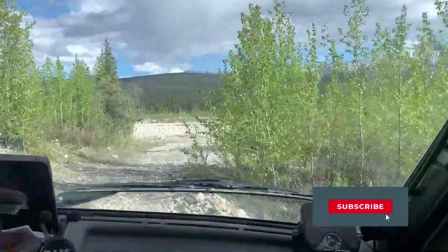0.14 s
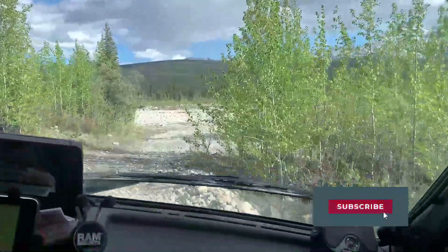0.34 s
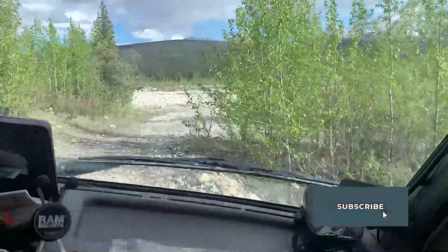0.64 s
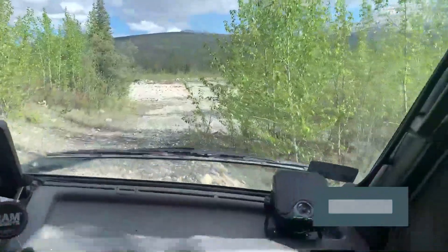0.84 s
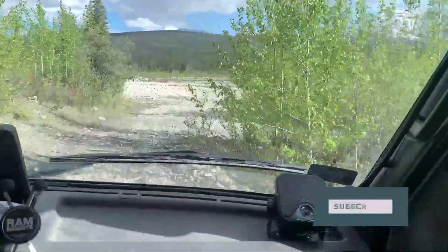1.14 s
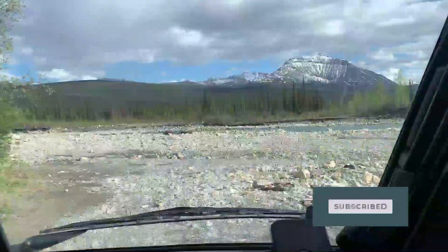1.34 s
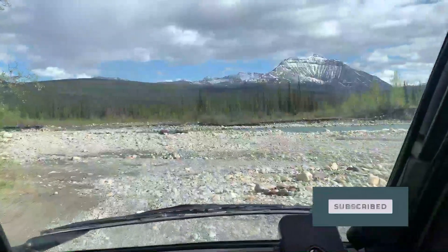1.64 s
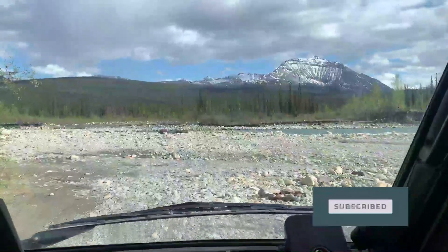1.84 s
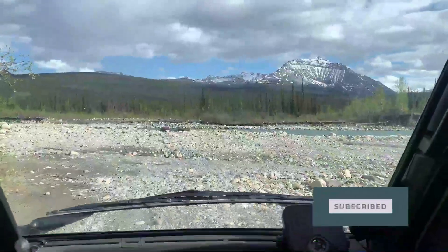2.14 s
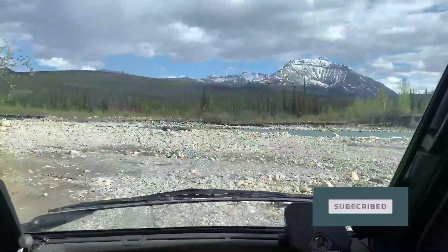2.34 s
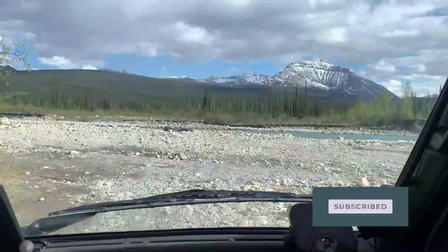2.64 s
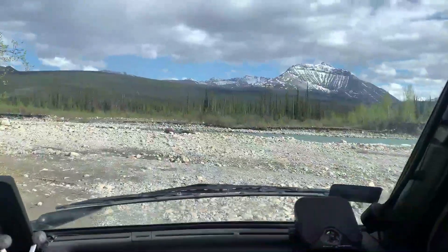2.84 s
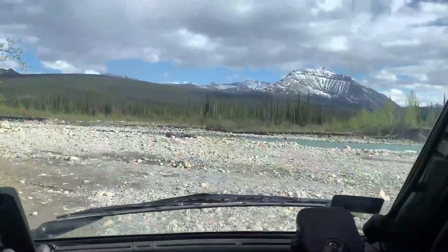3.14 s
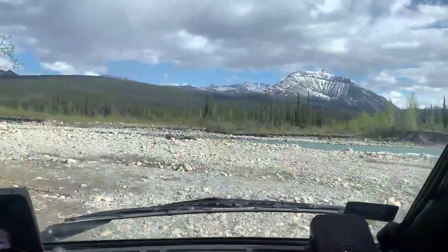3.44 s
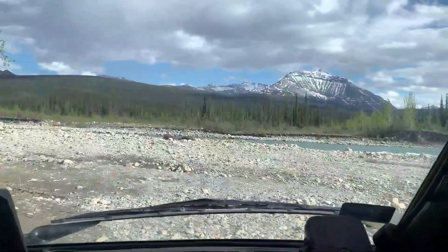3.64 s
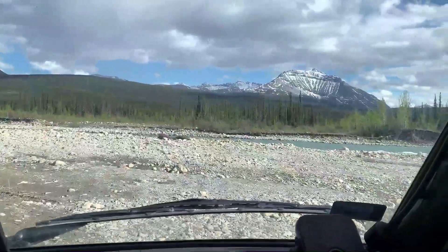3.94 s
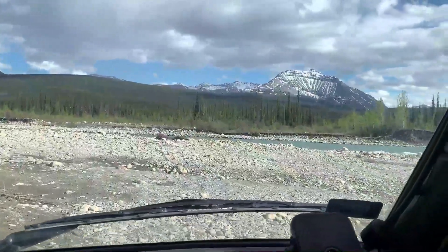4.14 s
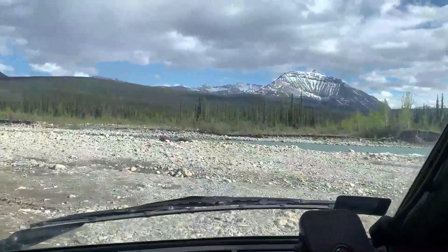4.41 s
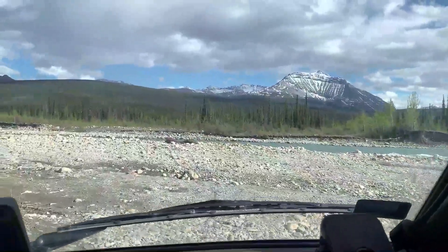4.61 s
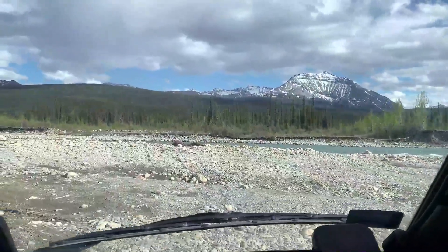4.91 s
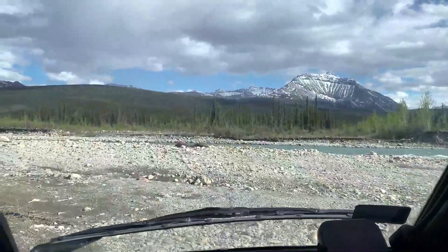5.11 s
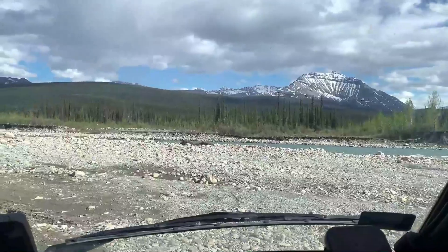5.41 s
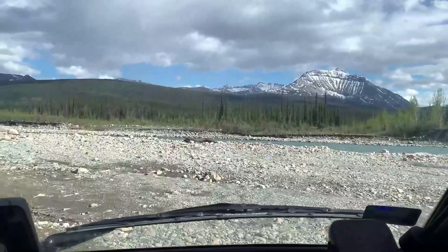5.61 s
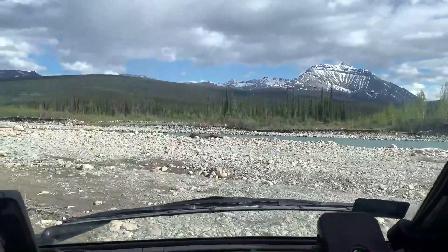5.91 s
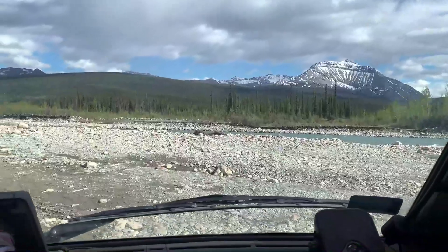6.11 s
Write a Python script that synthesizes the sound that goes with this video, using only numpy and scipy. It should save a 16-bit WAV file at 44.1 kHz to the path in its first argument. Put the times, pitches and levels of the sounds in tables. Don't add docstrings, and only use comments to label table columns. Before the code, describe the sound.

Diesel van crawls over rocks with boomy lurches, grinding stones and clattering cabin parts, abruptly cutting to quieter gravel crunch and idle.

```python
import sys
import numpy as np
from scipy import signal
from scipy.fft import rfft, irfft, next_fast_len
from scipy.io import wavfile
from scipy.ndimage import uniform_filter1d, map_coordinates

SR = 44100
rng = np.random.default_rng(int(sys.argv[2]) if len(sys.argv) > 2 else 0)


def ratio(d):
    e = np.asarray(d, float) / 20
    return 10 ** e


def pcm_store(signal):
    levels = np.round(np.clip(np.atleast_2d(signal), -1, 1) * 32767)
    wavfile.write(sys.argv[1], SR, levels.astype(np.int16).T)


N = 276066
SCENE_CHANGE_S = 1.3575


def unit(x):
    return x / np.sqrt(np.mean(x ** 2) + 1e-20)


def along(points, hz):
    f, v = np.transpose(points)
    return np.interp(np.log(hz + 1), np.log(f + 1), v)


def curves(rows):
    s, *cols = np.transpose(rows)
    return [np.interp(np.arange(N) / SR, s, c) for c in cols]


def wobble(knots_per_s):
    knots = rng.standard_normal(int(N * knots_per_s / SR) + 4)
    return map_coordinates(knots, [np.arange(N) * knots_per_s / SR])


def filtered(x, response):
    m = next_fast_len(N + 8192)
    return irfft(rfft(x, m) * response(np.fft.rfftfreq(m, 1 / SR)), m)[..., :N]


def trim(hz):
    # (frequency [Hz], width [Hz], lift [dB])
    trim_notes = [(617, 18, 7), (1340, 35, 5), (1496, 15, 3), (1672, 34, 5.5), (2330, 25, 1.5),
                  (2970, 17, 6), (3270, 34, 4), (3620, 26, 2), (3671, 15, -4), (4000, 15, 3),
                  (4100, 14, 4.5), (6000, 32, 7.5), (6640, 60, 5.5), (10600, 18, 9)]
    return ratio(sum(db / (1 + (2 * (hz - note_hz) / width_hz) ** 2) for note_hz, width_hz, db in trim_notes))


def rush(spectrum, patchy_db):
    z = signal.stft(rng.standard_normal((2, N)), nperseg=512)[2]
    field = uniform_filter1d(rng.standard_normal(z.shape[1:]), size=7, axis=0)
    field = uniform_filter1d(field, size=4, axis=1)
    pair = signal.istft(z * ratio(patchy_db * unit(field)), nperseg=512)[1][:, :N]
    return unit(filtered(pair, lambda hz: ratio(along(spectrum, hz)) * trim(hz)))


def swell(t, rise_s, t60_s):
    return (1 - np.exp(-t / rise_s)) * ratio(-60 * t / t60_s)


def bursts(times_s, dbs, t60s, rise_s):
    env, t = np.zeros(N + SR), np.arange(SR // 4) / SR
    for s, db, t60_s in zip(times_s, dbs, t60s):
        env[round(s * SR):][:len(t)] += ratio(db) * swell(t, rise_s, max(t60_s, .01))
    return env[:N]


def clatter(phase, t60_s):
    sizes = ratio(4.7 * rng.standard_normal(int(phase[-1]) + 1))
    size = sizes[phase.astype(int)]
    rate_hz = np.gradient(phase) * SR
    return size * swell(phase % 1 / rate_hz, .002, t60_s)


def rocking(rows):
    out, t = np.zeros(N), np.arange(N) / SR
    for s, db, width_s in rows:
        near = slice(max(round((s - 4 * width_s) * SR), 0), round((s + 4 * width_s) * SR))
        out[near] += ratio(db) * np.exp(-((t[near] - s) / width_s) ** 2)
    return out


def pebbles(count, centre_hz, spread, cycles, size_db):
    draw, t = rng.random((count, 5)), np.arange(700) / SR
    hz = centre_hz * np.exp(spread * (2 * draw[:, 1:2] - 1))
    life_s = np.minimum(cycles * (.5 + draw[:, 2:3]) / hz, .005)
    size = ratio(size_db * draw[:, 3:4]) * np.sqrt(centre_hz / hz)
    ring = size * t / life_s * np.exp(-t / life_s) * np.sin(2 * np.pi * hz * t)
    port_start = (draw[:, 4:] > .5) * 2 * N
    at = (draw[:, :1] * N).astype(int) + np.arange(len(t)) + port_start
    return unit(np.bincount(at.ravel(), ring.ravel(), 4 * N).reshape(2, -1)[:, :N])


def engine():
    # (time [s], rate [Hz])
    firing_rate = [(0, 49.3), (.1, 50), (.36, 46.5), (.6, 51), (.8, 50.5), (1.1, 53), (1.35, 51),
                   (1.37, 49.5), (6.26, 49.4)]
    # (time [s], level [dB])
    firing_level = [(0, -30.5), (.074, -20), (.194, -23.5), (1.074, -16.5), (1.146, -23.5), (1.218, -15),
                    (1.35, -31), (1.54, -27), (1.82, -52), (1.97, -29), (2.23, -43), (2.42, -33), (2.72, -31),
                    (3.28, -35), (3.82, -30), (4.44, -31), (6.04, -31.5), (6.26, -37)]
    # (time [s], level [dB], width [s])
    jolts = [(1.535, -14, 0.014), (1.72, -22, .03), (1.92, -17, 0.024), (2.04, -32, 0.023),
             (2.13, -26, 0.022), (2.2, -20, 0.02), (2.34, -20, 0.026), (2.41, -15, 0.0098),
             (2.52, -18.5, 0.028), (2.58, -30, 0.023), (2.8, -31, 0.078), (2.975, -24, 0.028),
             (3.23, -20.5, 0.038), (3.3, -18, 0.02), (3.44, -19.5, 0.03), (3.52, -21, 0.01),
             (3.62, -29, 0.02), (4.27, -23, 0.03), (4.4, -24, 0.032), (4.48, -24, 0.044),
             (4.62, -19, 0.0053), (4.7, -26, 0.022), (5.55, -28, 0.022), (5.81, -25, 0.04),
             (5.98, -28, 0.04)]
    # (multiple of full cycle [1], level re firing tone [dB])
    idle_orders = [(4, -15), (5, -21), (6, -15), (7, -19.5), (9, -26.5), (10, -16), (11, -15), (12, -22),
                   (13, -15.5), (19, -18)]
    # (frequency [Hz], density [dB/Hz])
    tappet_spectrum = [(7000, -37), (9500, -7), (10900, -8), (12500, -11), (15800, -31)]
    (firing_hz,), (level_db,) = curves(firing_rate), curves(firing_level)
    cycle = np.cumsum(firing_hz / 8) / SR
    firing = 2 * np.pi * 8 * cycle
    harmonics = np.sin(firing) - 0.17 * np.cos(2 * firing) - 0.064 * np.sin(3 * firing)
    tone = (ratio(level_db) + ratio(-5.5) * rocking(jolts)) * harmonics
    for order, db in idle_orders:
        order_gain = ratio(-29.0 + db + 5 * wobble(4))
        tone += order_gain * np.sin(2 * np.pi * (round(order) * cycle + rng.random()))
    ticking = 0.48 + unit(clatter(cycle * 8 / 2, 0.068))
    tappet = ratio(-84.5) * ticking * rush(tappet_spectrum, patchy_db=3.0)
    return np.sqrt(2) * tone * [[1], [0]] + tappet


def road():
    # (time [s], roughness [dB])
    ground = [(0, 13), (.184, 3), (.46, 13), (.71, 13.5), (.83, 6), (.97, 13.5), (1.08, 9.5), (1.16, 13.5),
              (1.352, 3.5), (1.74, 3.5), (2.04, 0), (2.4, 2), (3.68, 2), (3.78, -2), (4.36, 1.5), (4.9, 0),
              (5.41, -5), (6.26, -5)]
    # (time [s], peak [dB], hardness [dB], t60 [s])
    climb_stones = [(.156, -42, -14, 0.053), (.2853, -36, 6, 0.069), (0.375, -29, -2, 0.057),
                    (.4519, -34.5, 20, 0.041), (.5003, -24, 2, 0.04), (.5594, -64, 17, 0.039),
                    (.5861, -31.5, -11, 0.052), (0.616, -26, 0, 0.09), (0.718, -35.5, -1.5, 0.25),
                    (.758, -29.5, 1.5, 0.084), (.789, -25, -11.5, 0.037), (.851, -26, 4, 0.065),
                    (.874, -20, 7, 0.027), (0.894, -26, 18, 0.073), (0.918, -29.5, 14.5, 0.1),
                    (.979, -31, 6, 0.084), (1.007, -29, -3, 0.03), (1.11, -21.5, 7.5, 0.1),
                    (1.16, -26, -5.5, 0.062), (1.1894, -21, 0, 0.023), (1.3427, -24.5, -4, 0.028)]
    # (time [s], peak [dB], hardness [dB], t60 [s])
    gravel_stones = [(1.459, -34.5, -15, 0.025), (1.5424, -39, 19, 0.029), (1.672, -44, -17, 0.042),
                     (1.717, -37.5, 12, 0.1), (2.152, -41.5, -19, 0.048), (2.233, -35, 2, 0.12),
                     (2.3094, -43, 12.5, 0.12), (2.387, -27.5, 2, 0.051), (2.435, -29.5, 7, 0.06),
                     (2.53, -39, -5, 0.076), (2.7094, -30.5, -7, 0.033), (2.75, -38.5, -16, 0.031),
                     (2.9851, -29, -1, 0.022), (3.035, -51, -7, 0.021), (3.1073, -37, -16.5, 0.03),
                     (3.2161, -38, 2, 0.07), (3.378, -37.5, 11, 0.088), (3.8861, -53, -11, 0.063),
                     (4.014, -30.5, 0, 0.033), (4.156, -40.5, 1, 0.076), (4.181, -39, 1, 0.056),
                     (4.253, -37, 11, .055), (4.2706, -42, 8, .029), (4.307, -45, -9, 0.1),
                     (4.596, -37, 6, 0.076), (4.813, -52, -2, 0.031), (4.916, -35, 4.5, 0.07),
                     (5.3134, -51, -16, 0.044), (5.729, -44.5, -2, 0.11), (6.068, -38.5, -4, 0.028)]
    # (time [s], swell [dB], width [s])
    bumps = [(0, -27.5, 0.062), (.244, -22.5, 0.052), (.458, -31, 0.072), (.714, -30, 0.048),
             (.97, -29, 0.11), (1.156, -25.5, 0.081), (1.6, -29.5, 0.068), (1.74, -24.5, 0.059),
             (1.891, -26, 0.035), (2.04, -27, 0.063), (2.4, -26.5, 0.23), (2.55, -39, 0.054),
             (2.9, -27, 0.16), (3.11, -27.5, 0.025), (3.32, -35, 0.097), (3.53, -36, 0.066),
             (3.72, -36, 0.03), (4.05, -37.5, 0.23), (4.36, -35, 0.15), (4.62, -31.5, 0.086),
             (4.92, -31.5, 0.035), (5.3, -49, 0.25), (5.75, -41, 0.11), (5.99, -38, 0.043)]
    # (frequency [Hz], density [dB/Hz])
    boom_spectrum = [(14, -51), (24, -29), (34, -15), (42, -2), (54, 1), (70, -2.5), (85, -4.5), (115, -4),
                     (135, -9), (155, -8.5), (172, -23.5), (260, -21.5), (400, -71.5)]
    growl_spectrum = [(88, -42), (150, -7.5), (199, -6), (281, -11.5), (411, -5), (655, -18.5),
                      (746, -13.5), (1230, -21), (1350, -25), (2000, -26.5), (2600, -55), (4400, -120)]
    crunch_spectrum = [(500, -42), (1000, -1), (1500, -1), (2500, -4.5), (4000, -11), (5200, -12.5),
                       (7000, -24.5), (8000, -29), (10000, -54)]
    grit_spectrum = [(5000, -19), (7000, -1.5), (7900, -6.5), (8350, 1), (8900, 0.5), (9500, -2.5),
                     (11000, -5.5), (12500, -6), (15000, -3.5), (15700, -15), (16100, -60)]
    rough_db, = curves(ground)
    climb = np.arange(N) / SR < SCENE_CHANGE_S
    s, db, hard_db, t60_s = np.transpose(climb_stones + gravel_stones)
    lumps, grains = wobble(28), wobble(160)

    boom_db = -35.5 + 0.44 * rough_db + 4 * climb
    growl_db = -41.5 + 0.27 * rough_db + 3.5 * climb + 0.78 * lumps + 1.36 * wobble(60)
    crunch_db = -54 + rough_db + 1.5 * climb + 1.0 * lumps + 1.17 * grains
    grit_db = -66.5 + 1.47 * rough_db - 0.5 * climb + 1.2 * lumps + 1.85 * grains + 2.65 * wobble(18)

    growl = ratio(growl_db) + bursts(s, db - 5 - hard_db, 2.0 * t60_s, 0.0079)
    crunch = ratio(crunch_db) + bursts(s, db - 3.5, 1.45 * t60_s, 0.0092)
    grit = ratio(grit_db) + bursts(s, db - 25 + hard_db, 2.0 * t60_s, 0.008)

    heave = rush(boom_spectrum, patchy_db=0.0)
    sway = ratio(boom_db) + ratio(-4.0) * rocking(bumps)
    boom = sway * unit(np.tanh(0.5 * heave))
    low_stones = pebbles(count=1200, centre_hz=594.6, spread=0.92, cycles=2.5, size_db=11.0)
    low = rush(growl_spectrum, patchy_db=1.25) + 0.48 * low_stones
    middle_stones = pebbles(count=3000, centre_hz=2608, spread=1.05, cycles=4.9, size_db=14.5)
    middle = rush(crunch_spectrum, patchy_db=2.0) + 0.46 * middle_stones
    return boom + growl * low + crunch * middle + grit * rush(grit_spectrum, patchy_db=2.5)


def knocks():
    # (time [s], peak [dB], pitch [Hz], t60 [s])
    thumps = [(.01, -25.5, 114, 0.59), (.22, -22, 93, .3), (0.931, -24, 101, .3), (.42, -25, 125, 0.092),
              (0.997, -21.5, 156, 0.066), (1.136, -15, 123, 0.027), (1.157, -26, 133, 0.16),
              (1.633, -18, 71.3, 0.14), (1.691, -17, 129, 0.079), (1.74, -17, 69, 0.2),
              (1.878, -16.5, 80.5, 0.14), (2.04, -19, 70.6, 0.16), (2.47, -16, 113.6, 0.14),
              (2.49, -17.5, 166, 0.12), (2.496, -30, 200, 0.059), (2.502, -16, 114, 0.19),
              (2.904, -21, 90, 0.1), (3.098, -25, 148, .088), (3.309, -15, 130.7, 0.17),
              (3.33, -21.5, 155, 0.1), (3.334, -39, 233, 0.056), (3.339, -15.5, 110.7, 0.23),
              (3.399, -19, 72.4, 0.28), (3.709, -19.5, 114, 0.16), (3.915, -25, 141, 0.13),
              (4.14, -26, 155, 0.15), (4.34, -19.5, 105.6, 0.17), (4.608, -30, 74.5, 0.084),
              (4.691, -21, 111, 0.15), (4.915, -25, 125, 0.15), (5.371, -24.5, 109, 0.12)]
    # (time [s], peak [dB], pitch [Hz], t60 [s])
    rings = [(.002, -25.5, 2000, 0.058), (.379, -30, 1030, 0.056), (.72, -23, 880, 0.065),
             (.872, -20, 1060, .05), (.515, -30, 2600, 0.038), (0.55, -45, 2550, 0.052),
             (.63, -22.5, 487, 0.2), (.64, -18.5, 1098, 0.07), (0.66, -33, 1005, .07),
             (.755, -21.5, 1688, 0.067), (.765, -27, 3270, .05), (.79, -20, 911, 0.1),
             (.87, -25, 2480, 0.05), (.892, -30.5, 3900, 0.065), (.92, -27, 3520, 0.079),
             (.921, -28, 2370, 0.069), (.952, -25, 1500, 0.071), (.979, -25.5, 510, 0.18),
             (.981, -15.5, 1394, 0.031), (1.112, -21, 1040, 0.073), (1.115, -25.5, 4000, 0.067),
             (1.16, -30, 3630, 0.08), (1.172, -20, 1420, 0.068), (1.447, -35, 895, 0.1),
             (1.84, -49, 6000, .08), (1.845, -43, 3030, 0.083), (1.879, -25.5, 476, 0.059),
             (2.268, -42, 3930, 0.043), (2.389, -33.5, 2700, 0.065), (2.438, -22, 435, 0.069),
             (2.53, -26.5, 2326, 0.072), (2.529, -37, 4000, .045), (2.752, -31, 760, .05),
             (3.108, -32, 1010, .04), (3.285, -33, 800, 0.067), (3.3, -44, 2750, .08),
             (4.155, -29, 994, 0.054), (4.271, -37, 6800, .04), (4.883, -48.5, 4600, .05),
             (4.905, -34, 756, 0.18), (4.918, -37, 3120, 0.051), (4.5, -50, 6000, 0.021),
             (5.003, -46, 5100, 0.033), (5.038, -47, 5350, .03), (5.95, -49, 2900, 0.062)]
    out, t = np.zeros((2, N + SR)), np.arange(SR // 3) / SR
    for s, db, hz, t60_s in thumps + rings:
        drift = np.cumsum(rng.normal(0, .008 + hz / 1.2e5, len(t)))
        place = [[1], [rng.choice([-1, 1]) * min(hz / 1500, 1)]]
        note = ratio(db) * swell(t, 0.0032, t60_s) * np.sin(2 * np.pi * hz * t + drift)
        out[:, round(s * SR):][:, :len(t)] += note * place
    return out[:, :N]


def ticks():
    # (time [s], peak [dB], centre [Hz], t60 [s])
    stone_hits = [(.002, -30.5, 2820, 0.057), (.623, -29.5, 1490, 0.15), (.98, -27, 970, 0.097),
                  (1.113, -29.5, 4600, 0.035), (1.672, -25.5, 1030, 0.039), (1.73, -41.5, 11060, 0.06),
                  (2.126, -34, 795, 0.058), (2.242, -43, 12000, 0.04), (2.494, -23, 190, 0.074),
                  (2.566, -43, 2000, 0.037), (2.75, -32.5, 2400, 0.02), (2.964, -31.5, 804, 0.034),
                  (3.106, -32, 1790, 0.04), (3.146, -46, 5530, .02), (3.288, -47, 4500, 0.042),
                  (3.33, -16, 187, 0.089), (3.475, -51, 3500, .05), (3.48, -54.5, 11000, 0.14),
                  (4.016, -40.5, 5430, 0.028), (4.156, -31, 1090, 0.052), (4.272, -40, 7740, .041),
                  (4.62, -42, 5000, 0.018), (4.918, -37, 2600, 0.029), (5.685, -52, 5030, 0.015),
                  (5.715, -36.5, 1100, 0.032), (5.76, -45, 4800, 0.02), (6.073, -44.5, 5600, 0.013),
                  (.12, -40.5, 2800, .03), (.271, -50, 1600, 0.027), (.33, -40, 2880, .03),
                  (.402, -48, 2500, 0.031), (0.452, -34, 4300, 0.041), (.587, -46, 2000, 0.021),
                  (.618, -31, 2800, 0.042), (0.639, -36, 3200, .05), (0.732, -39, 3480, .05),
                  (.778, -29.5, 4600, 0.024), (.8659, -31, 2600, 0.048), (0.867, -32, 4500, 0.022),
                  (.955, -31, 2500, .04), (.985, -31, 1800, .04), (1.0093, -33, 3800, 0.021),
                  (1.182, -25, 2200, 0.028), (1.44, -41, 2500, 0.034), (1.528, -41, 1800, .04),
                  (1.72, -44, 4170, 0.082), (1.9126, -46, 3000, .03), (2.015, -45, 4800, 0.023),
                  (2.119, -38, 1800, .03), (2.233, -50, 1500, 0.024), (2.338, -42, 6500, 0.023),
                  (2.375, -44, 6960, 0.024), (2.435, -39, 4200, 0.037), (2.5317, -42.5, 4500, 0.033),
                  (2.624, -45.5, 2800, .03), (2.66, -42, 2960, .03), (2.9866, -48.5, 3500, .03),
                  (3.035, -40, 900, 0.035), (3.3862, -49, 5000, 0.026), (3.632, -47, 2300, .03),
                  (3.831, -37, 1510, 0.033), (3.985, -48, 4960, 0.027), (4.137, -43, 2500, 0.036),
                  (4.2168, -42.5, 4000, 0.023), (4.2562, -42, 3000, 0.022), (4.3054, -38.5, 2400, 0.039),
                  (4.332, -47, 2600, .03), (4.343, -32, 890, 0.031), (4.596, -40, 3380, 0.02),
                  (4.813, -57, 3500, 0.029), (4.902, -41, 900, 0.046), (4.918, -34, 990, 0.034),
                  (4.961, -51, 5600, 0.045), (5.004, -52, 5500, 0.045), (5.038, -57, 5460, 0.029),
                  (5.314, -38, 900, 0.033), (5.491, -52, 2800, 0.065), (5.7354, -53, 2300, 0.024),
                  (5.951, -50.5, 3400, 0.04), (6.0696, -44.5, 2100, 0.028)]
    out, t = np.zeros((2, N + SR)), np.arange(SR // 8) / SR
    for s, db, hz, t60_s in stone_hits:
        band = signal.butter(3, [hz / 1.6, min(hz * 1.5, 17000)], "bandpass", fs=SR)
        crack = unit(signal.lfilter(*band, rng.standard_normal((2, len(t)))))
        rise_s = .0006 + 2 / hz
        out[:, round(s * SR):][:, :len(t)] += ratio(db) * swell(t, rise_s, t60_s) * crack
    return out[:, :N]


def scene_change():
    t = np.arange(N) / SR - SCENE_CHANGE_S
    return ratio(-31 - 60 * np.minimum(np.abs(t) / .003, 5)) * rng.standard_normal((2, N))


def panel():
    # (time [s], swing rate [Hz], level [dB])
    chatter = [
        (2.83, 20.8, -95),
        (2.86, 20.8, -65),
        (3.08, 20.8, -67),
        (3.16, 22.6, -66),
        (3.25, 21, -66),
        (3.45, 20.6, -69),
        (3.6, 20.8, -95),
    ]
    # (frequency [Hz], density [dB/Hz])
    panel_spectrum = [(7800, -37), (8700, 0), (9600, -20), (12500, -12), (14000, -6), (15300, 0),
                      (16000, -25)]
    swing_hz, level_db = curves(chatter)
    swing = np.cumsum(swing_hz) / SR
    strikes = clatter(swing + .48, .045) + .5 * clatter(swing + .98, .045)
    return ratio(level_db) * unit(strikes) * rush(panel_spectrum, patchy_db=2.0) * ratio(2)


def lag(hz):
    return np.pi * np.where(hz > 6000, (hz - 11000) / 4900, -hz / 3500)


def ports(pair):
    # (frequency [Hz], correlation [1])
    likeness = [(60, 0.94), (300, 0.66), (640, 0.74), (1100, 0.061), (1800, 0.45), (3000, 0.05),
                (6400, 0.24), (7300, 0.11), (8200, 0.85), (16000, 0.91)]
    # (frequency [Hz], level [dB])
    lean = [(60, -1.2), (150, -1.7), (400, 1.6), (900, 1.6), (2400, -.3), (4500, -1), (6000, -3.5),
            (7500, -1), (8200, 0)]

    def shares(hz):
        turn = np.arccos(np.clip(along(likeness, hz), -1, 1)) / 2
        return np.array([np.cos(turn), np.sin(turn)])

    mid, side = filtered(pair, shares)
    sides = np.array([[1], [-1]])
    return filtered(mid + sides * side,
                    lambda hz: ratio(sides * along(lean, hz) / 2) * np.exp(-1j * sides * lag(hz)))


def scene():
    return ports(engine() + road() + knocks() + ticks() + scene_change() + panel())


def top_cut(x):
    return signal.sosfilt(signal.butter(12, 17070, fs=SR, output="sos"), x)


def record(dry):
    held = dry / (1 + np.abs(dry / .45) ** 4) ** (1 / 4)
    mix = filtered(held, lambda hz: hz < 15850)
    return top_cut(mix)


dry = scene()
out = record(dry)
pcm_store(out)
```